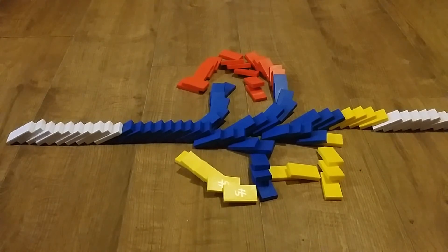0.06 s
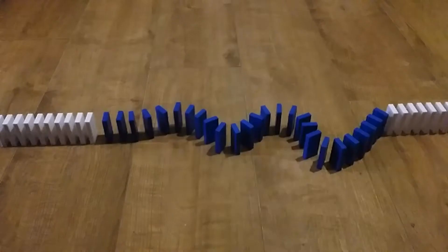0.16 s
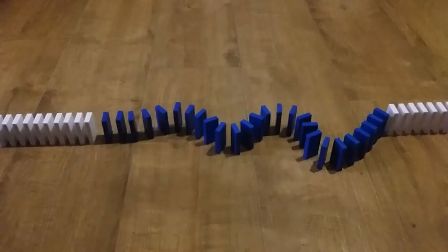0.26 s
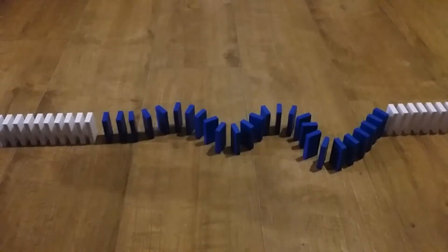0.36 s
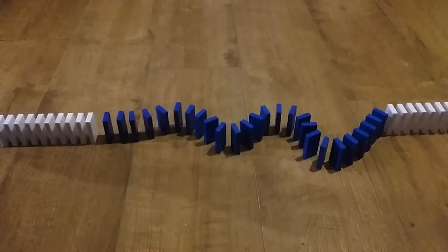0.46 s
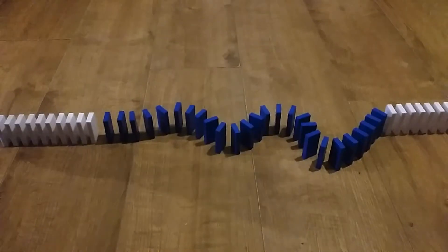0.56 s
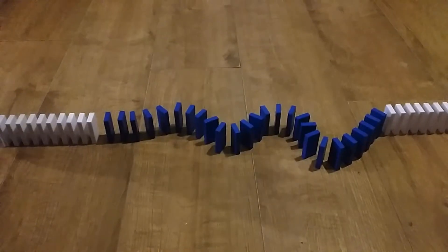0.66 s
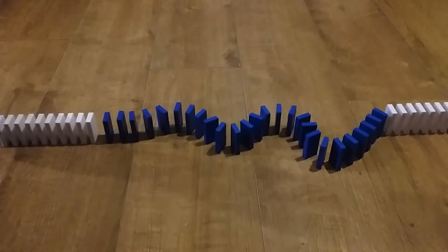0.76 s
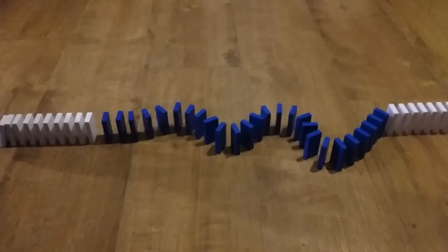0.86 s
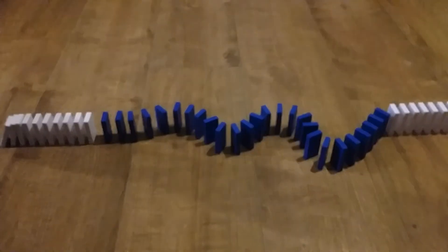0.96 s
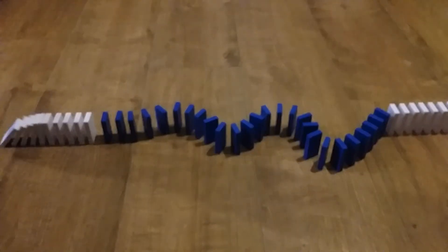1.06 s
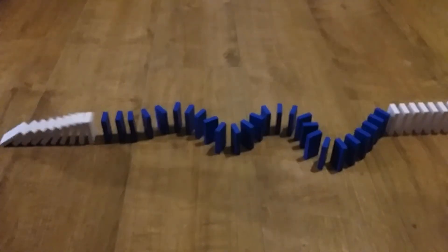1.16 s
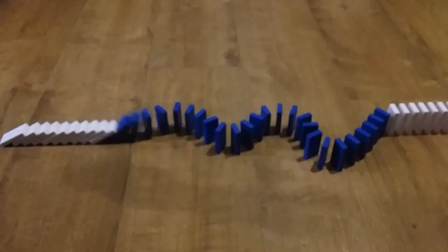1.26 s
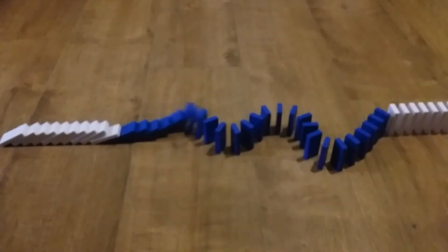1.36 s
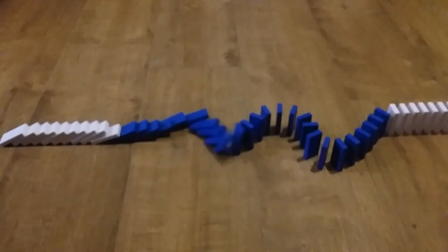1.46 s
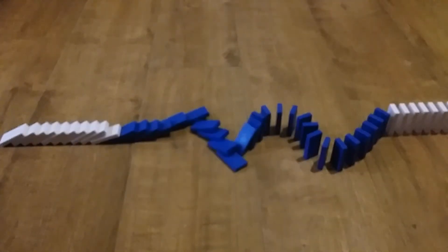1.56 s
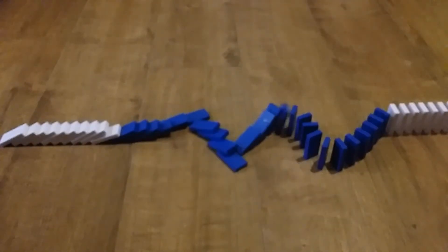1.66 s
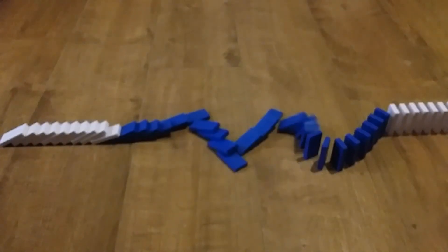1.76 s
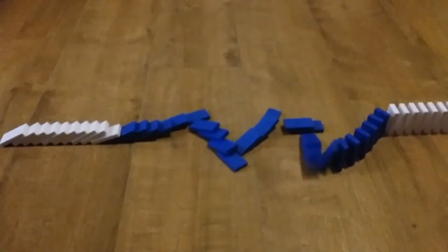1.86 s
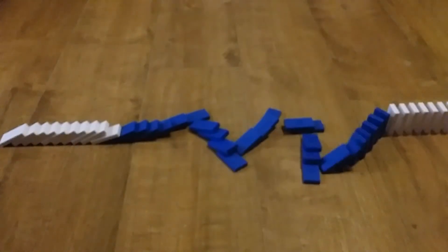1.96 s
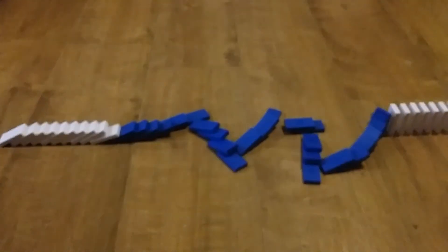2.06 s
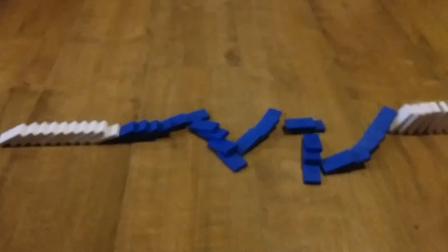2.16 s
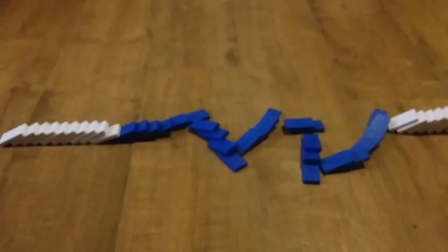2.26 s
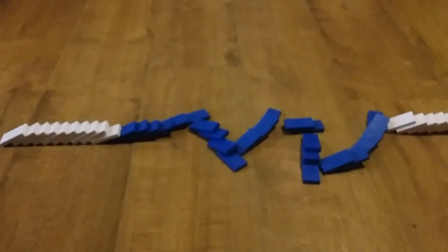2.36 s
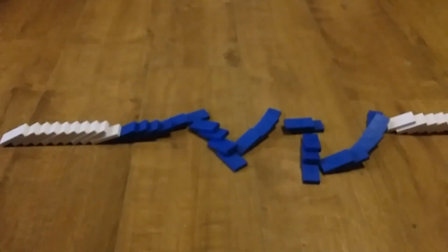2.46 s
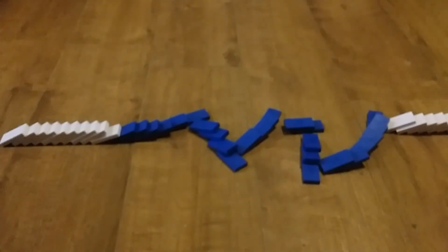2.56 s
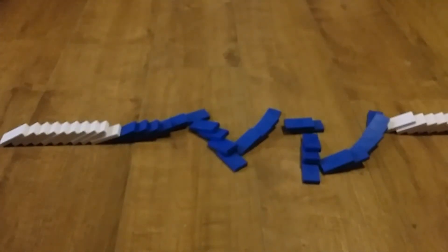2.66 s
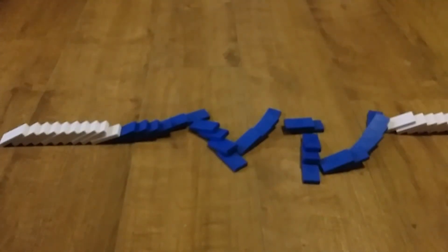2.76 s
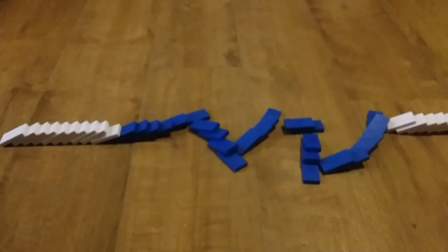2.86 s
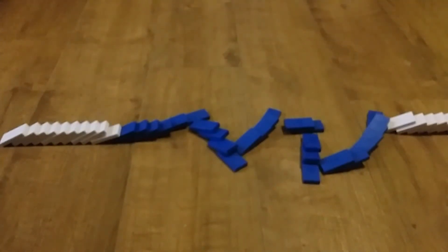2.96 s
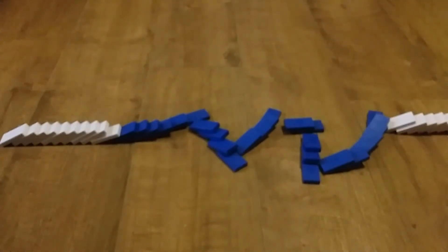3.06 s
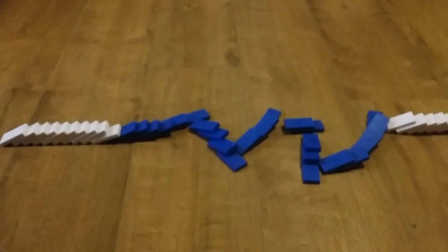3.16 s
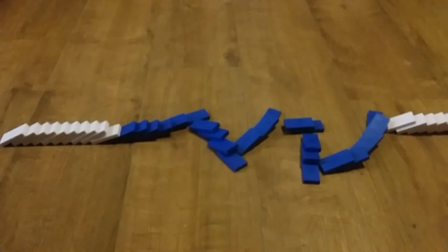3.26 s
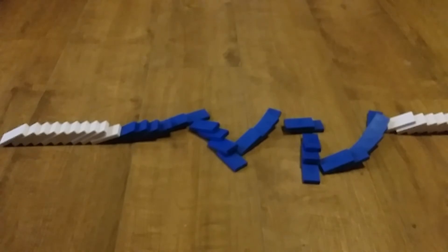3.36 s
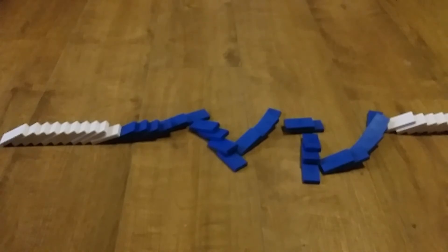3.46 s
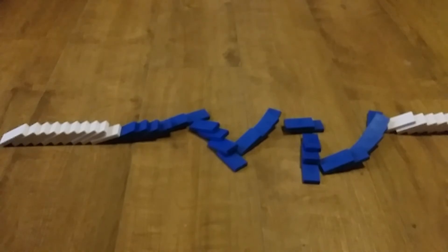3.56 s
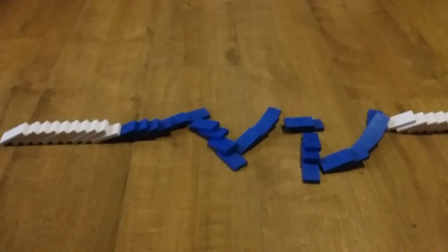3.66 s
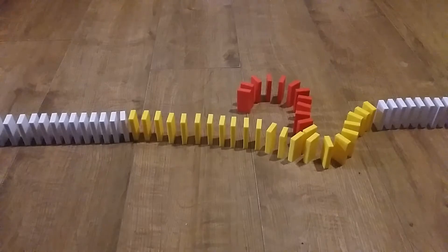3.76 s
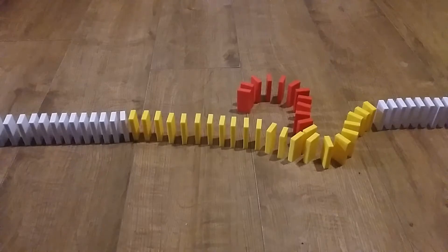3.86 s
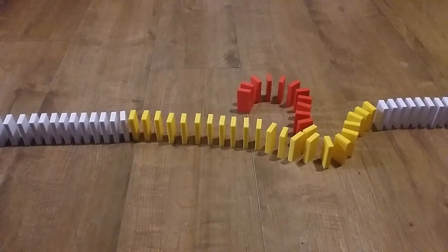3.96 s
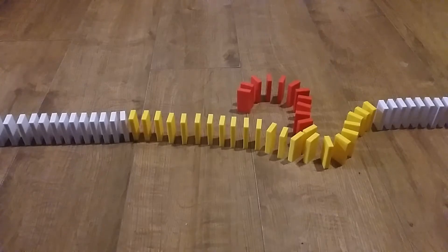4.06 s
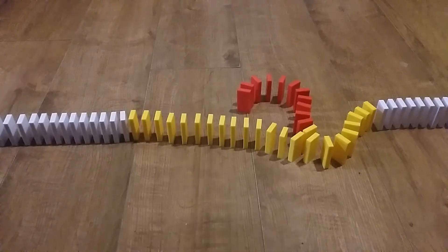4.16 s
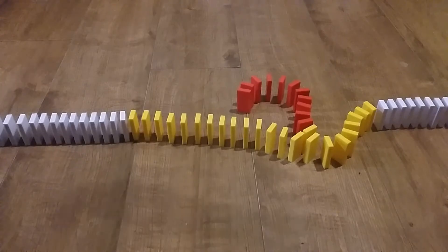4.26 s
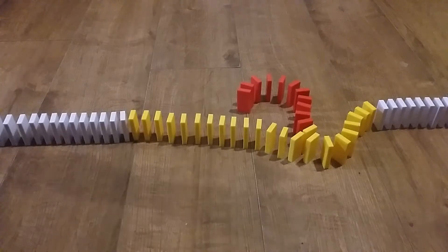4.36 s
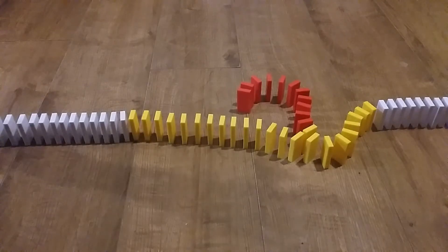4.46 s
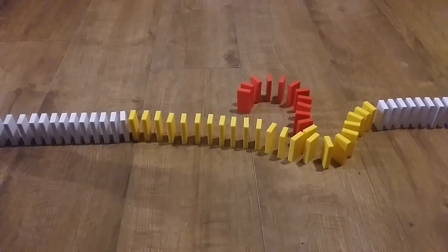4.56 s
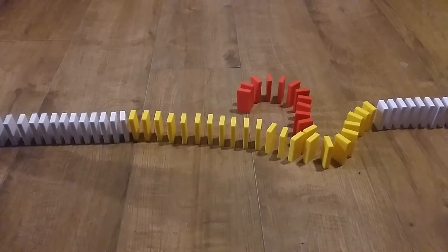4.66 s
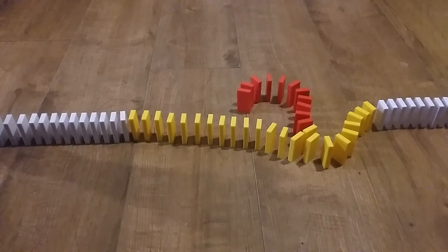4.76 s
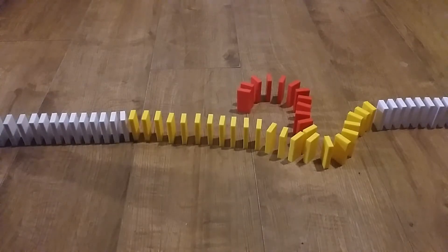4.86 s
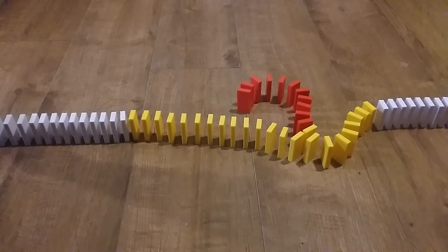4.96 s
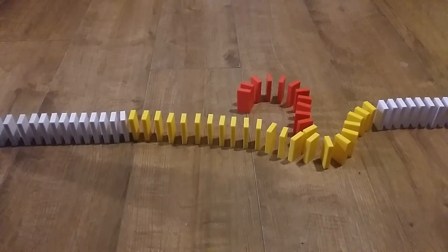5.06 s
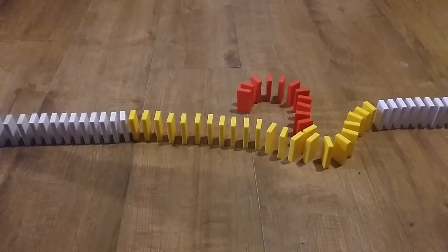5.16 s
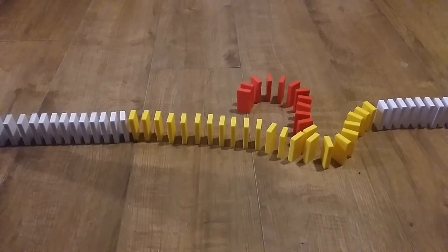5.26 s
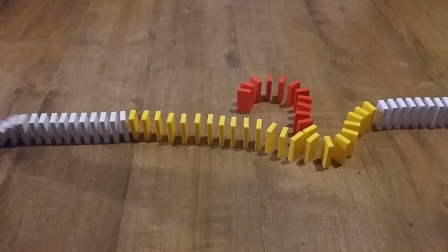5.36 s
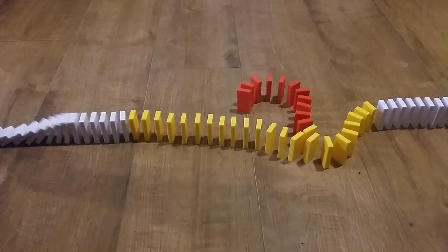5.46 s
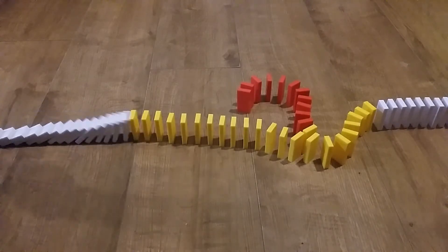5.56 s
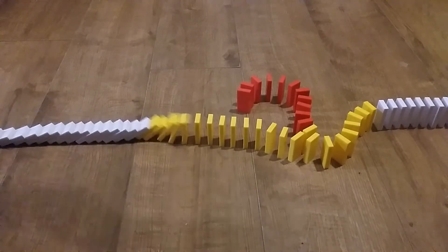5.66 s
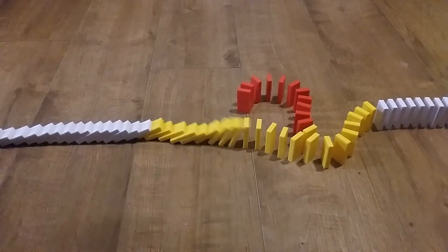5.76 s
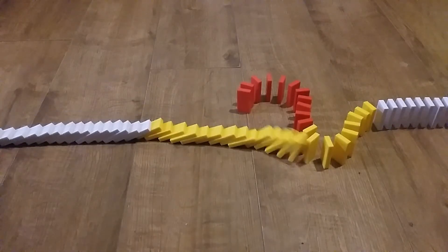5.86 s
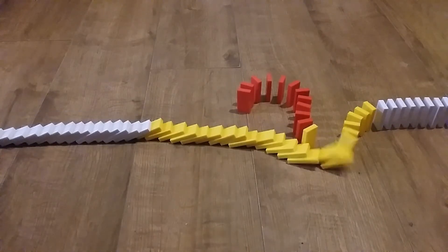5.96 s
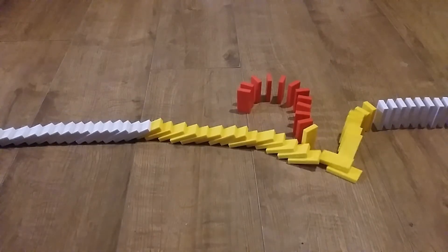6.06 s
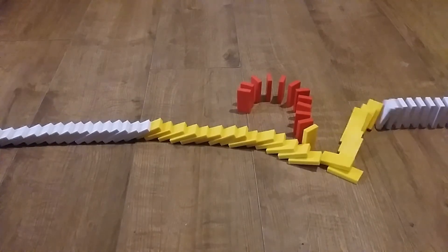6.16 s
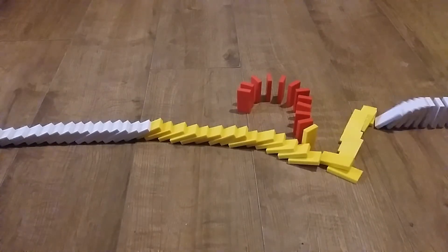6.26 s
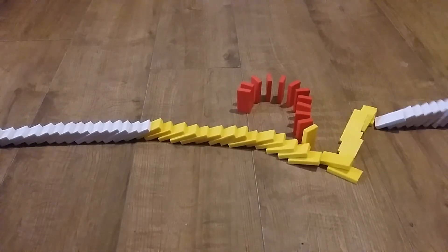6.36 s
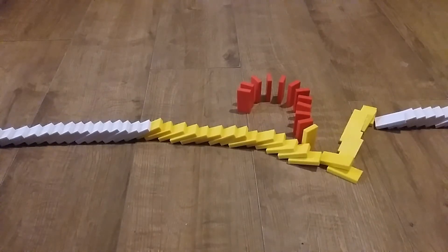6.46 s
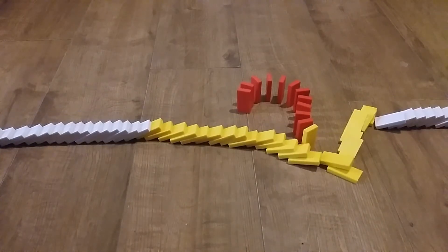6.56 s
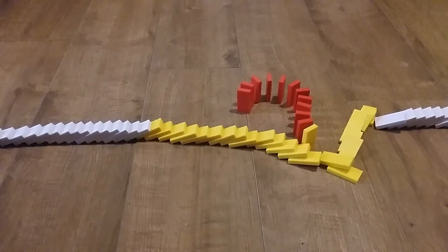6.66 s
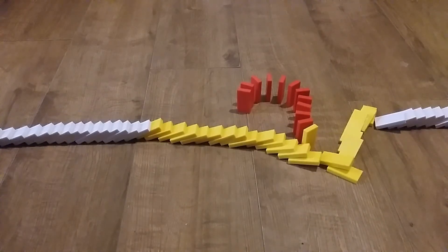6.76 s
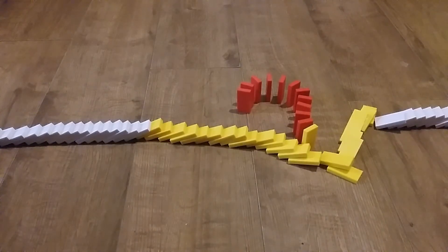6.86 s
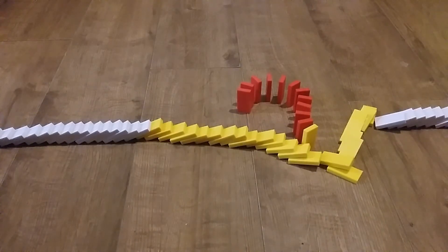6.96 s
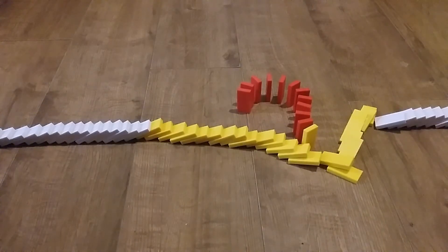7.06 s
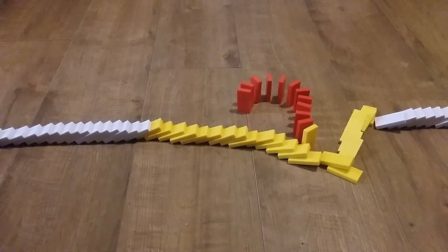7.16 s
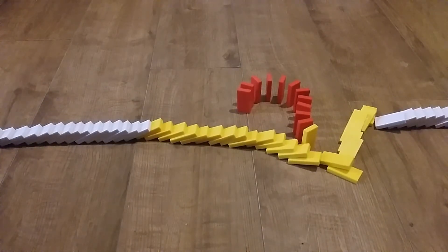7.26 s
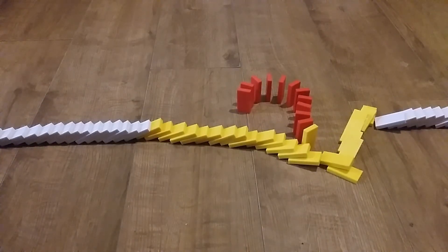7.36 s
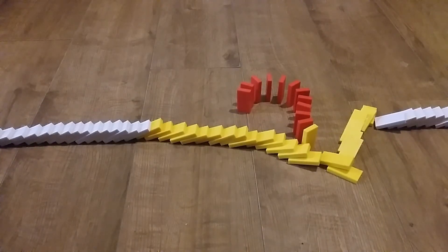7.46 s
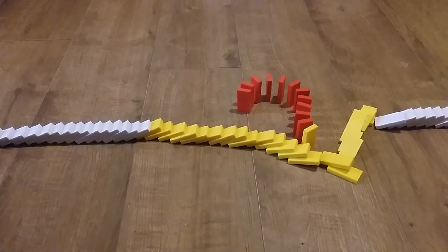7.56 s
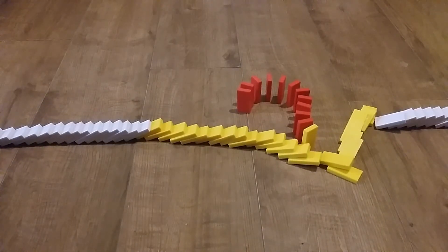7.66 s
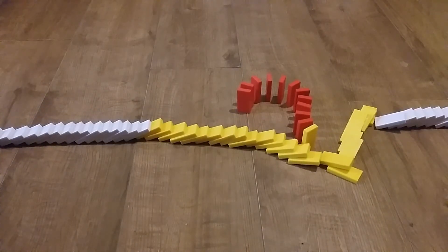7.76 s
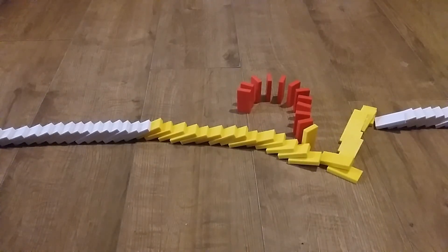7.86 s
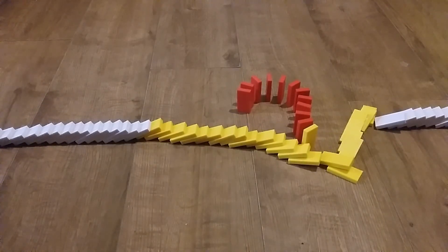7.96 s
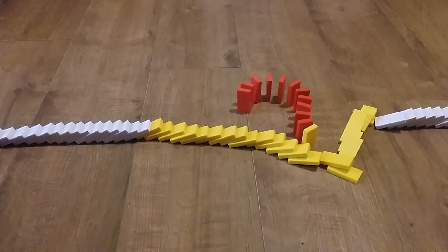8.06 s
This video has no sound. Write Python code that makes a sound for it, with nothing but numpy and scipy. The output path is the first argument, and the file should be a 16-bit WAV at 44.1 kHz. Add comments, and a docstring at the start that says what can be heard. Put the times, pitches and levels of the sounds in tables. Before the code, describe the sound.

Indoors on a wooden floor, a line of small plastic dominoes starts with sparse soft ticks, then accelerates into a bright, dense clatter with sharp slaps and low board thumps. It stops abruptly. After a quiet pause, tiny dry clicks bring in a faint low hum, and a second, brighter run rattles past and ends. The pickup is close in stereo, the sound moving left to right with short room reflections.

```python
"""Small plastic dominoes clatter down on a wooden floor indoors, in two runs that pass from left to right.
Each line starts slowly and gathers speed, louder and brighter: a tile ticks against the next and slides down.
Tiles that fall free, mostly at the bends and ends, slap the boards, which thump below.
Contacts excite banks of decaying modes, and dense decaying noise gives the room's reflections.
Shaped noise makes a quiet hiss; sines make a mains hum, heard at the start and again before the second run."""
import sys
import numpy as np
from scipy import signal
from scipy.fft import rfft, irfft
from scipy.io import wavfile
from scipy.ndimage import uniform_filter1d, map_coordinates

SR = 44100
rng = np.random.default_rng(int(sys.argv[2]) if len(sys.argv) > 2 else 0)


def persist_wave(psi):
    """Save psi, clipped to +-1, as 16-bit WAV."""
    counts = np.round(np.clip(psi, -1, 1) * 32767).astype(np.int16)
    wavfile.write(sys.argv[1], SR, np.atleast_2d(counts).T)


N = 357210
TIME = np.arange(N) / SR


def from_db(db):
    """Logarithmic level: decibels become an amplitude gain."""
    return 10 ** (np.asarray(db) / 20)


def rms_one(x):
    """Normalisation: scale to an rms of 1."""
    return x / np.sqrt(np.mean(x ** 2) + 1e-20)


def at_hz(points, size):
    """Log-frequency interpolation: read a (Hz, value) table at the bins of an FFT of this size."""
    hz, value = np.transpose(points)
    return np.interp(np.log(np.fft.rfftfreq(size, 1 / SR) + 1), np.log(hz), value)


def cut(x, hz, kind, order=2):
    """Maximally flat filtering: a Butterworth high- or low-pass."""
    sections = signal.butter(order, min(hz, .45 * SR), kind, fs=SR, output="sos")
    return signal.sosfilt(sections, x + 1e-18)


# Likeness of diffuse sound at the two ears. Each row: frequency in Hz, left-right correlation.
EAR_LIKENESS = [(100, 0.63), (500, 0.46), (1000, 0.096), (2000, 0.12), (14000, 0)]


def diffuse(size, spectrum=((20, 0), (20000, 0))):
    """Interaural correlation: stereo noise of rms 1 that is most alike at the two ears in the bass."""
    mid, side = rfft(rng.standard_normal((2, size)))
    alike = np.clip(at_hz(EAR_LIKENESS, size), -1, 1)
    both = np.sqrt(1 + alike) * mid + np.sqrt(1 - alike) * side * [[1], [-1]]
    return rms_one(irfft(both * from_db(at_hz(spectrum, size)), size))


# Spectrum of the room hiss. Each row: frequency in Hz, relative density in dB per Hz.
HISS_SPECTRUM = [(15, -45.5), (25, -14), (50, -9.5), (100, -1), (181, -12), (462, -14.5), (501, -17.5),
                 (558, -17.5), (2560, -27), (6040, -38.5), (13800, -35), (15000, -40.5)]
# Spectrum of the rush that joins the hum. Each row: frequency in Hz, relative density in dB per Hz.
RUSH_SPECTRUM = [(76, -29), (130, 4), (162, -13.5), (197, -6.5), (271, -12.5), (312, -5), (412, -9),
                 (747, -18.5), (948, -19), (3810, -31.5), (7480, -48), (13900, -37.5), (15000, -49.5)]
# Partials of the mains hum. Each row: frequency in Hz, rms in dB before the waver and the side balance.
HUM_PARTIALS = [(99.82, -50), (199.64, -80.5), (299.5, -82.5), (425.5, -76.5)]
# Soft swells of the rush. Each row: peak in seconds, level in dB above the rush, attack and release in seconds.
RUSH_SWELLS = [(4.142, 4, 0.063, 0.29), (4.283, 8.5, 0.0059, 0.085), (7.95, -5, 0.32, 0.4)]
HUM_OFF_S, HUM_ON_S = .15, 3.82
HUM_LAG_S = .0004   # the hum reaches the right ear later
HISS_DB, RUSH_DB = -72, -66
SILENT_UNTIL_S, HISS_FADE_S = 0.54, 0.4


def background(waver_db=1.1, waver_hz=12, swell_above_hz=300):
    """Additive hum and filtered noise: wavering hum and rush switch abruptly; hiss stops too, then fades in."""
    fade_in = np.clip((TIME - SILENT_UNTIL_S) / HISS_FADE_S, from_db(-58), 1)
    present = (TIME < HUM_OFF_S) + fade_in
    hiss = from_db(HISS_DB) * present * diffuse(N, HISS_SPECTRUM)

    running = uniform_filter1d(1. * ((TIME < HUM_OFF_S) | (TIME > HUM_ON_S)), size=100)
    ear_time = TIME - [[0], [HUM_LAG_S]]
    hum = sum(np.sqrt(2) * from_db(db) * np.sin(2 * np.pi * (hz * ear_time + rng.random()))
              for hz, db in HUM_PARTIALS)
    hum *= from_db(waver_db * rms_one(cut(rng.standard_normal(N), waver_hz, "low")))

    swell = sum(from_db(db) * np.interp(TIME, [s - attack, s, s + release], [0, 1, 0])
                for s, db, attack, release in RUSH_SWELLS)
    swelling = swell * cut(diffuse(N, RUSH_SPECTRUM), swell_above_hz, "high")
    rush = from_db(RUSH_DB) * (diffuse(N, RUSH_SPECTRUM) + swelling)
    # the hum leans right and the rush leans left
    return hiss + running * (hum * from_db([[-.8], [.8]]) + rush * from_db([[.7], [-.7]]))


def strike(times, level_db, modes, spread_db, detune, touch_s, flipped, count, lead=0, depth_db=0, order=3):
    """Modal synthesis: impulses ring a bank of damped resonators; `times` has one row of contacts per tile.

    Each contact is `count` tiny touches, the first stronger by `lead`, with a mode mix of its own.
    `depth_db` per octave favours the low modes; each tile has one of `order` tunings."""
    hz, width, mode_db = np.transpose(modes)
    tuned = np.repeat((rng.random(len(times)) * order).astype(int), times.shape[1])
    times, level_db, depth_db = [v.reshape(-1, 1) for v in np.broadcast_arrays(times, level_db, depth_db)]

    uneven_db = spread_db * rng.standard_normal((len(times), len(hz)))
    mix = from_db(mode_db - depth_db * np.log2(hz / hz[0]) + uneven_db) * np.sqrt(width)
    polarity = np.where(rng.random(mix.shape) < flipped, -1, 1)
    mix *= polarity / np.linalg.norm(mix, axis=1, keepdims=True)

    lag = rng.random((len(times), count)) * (np.arange(count) > 0)
    force = rng.standard_normal(lag.shape) * np.exp(-lag) + lead * (np.arange(count) == 0)
    force *= from_db(level_db) / np.linalg.norm(force, axis=1, keepdims=True)
    at = np.clip(((times + touch_s * lag) * SR).astype(int), 0, N - 1)

    first = at.min()
    size = min(N, at.max() + SR // 2) - first
    out = np.zeros(size)
    for j, tuning in enumerate(1 + detune * np.linspace(-1, 1, order) ** 3):
        mine = tuned == j
        for k, r in enumerate(np.exp(-np.pi * width / SR)):   # pole radius from the mode's width
            pushes = (force[mine] * mix[mine, k, None]).ravel()
            clicks = np.bincount(at[mine].ravel() - first, pushes, size) + 1e-18
            poles = [1, -2 * r * np.cos(2 * np.pi * hz[k] * tuning / SR), r * r]
            out += signal.lfilter([np.sqrt((1 - r * r) / 2)], poles, clicks)
    band = signal.lfilter([1, 0, -1], [1], out)   # nulls at zero frequency and at the top
    return np.pad(band, (first, N - first - size))


# Low modes of the floorboards. Each row: frequency in Hz, width in Hz, relative level in dB.
BOARD_MODES = [(229, 56, -13), (327, 14, -3), (377, 16, -6.5), (398.4, 16, 3.5), (435, 44, 1),
               (526, 76, -3.5), (557.6, 33, 1), (606.6, 43, -4.5), (656.6, 17, -3.5)]
# The hard surface right under a tile. Each row: frequency in Hz, width in Hz, relative level in dB.
KNOCK_MODES = [(864, 200, 1.5), (1050, 130, 3), (1209, 140, -0.5), (1520, 400, -3)]
# A tile chattering on its edge. Each row: frequency in Hz, width in Hz, relative level in dB.
RATTLE_MODES = [(2000, 1600, 6), (2620, 250, 0.5), (3200, 450, -8)]


def floor_sound(times, thump_db, depth_db, knock_db, rattle_db, thud_db=-10):
    """In-phase modal excitation: most board modes start together as a punch; the tile knocks, then chatters."""
    boards = strike(times, thump_db, BOARD_MODES, spread_db=3.5, detune=0.005, touch_s=0,
                    flipped=0.093, count=1, depth_db=depth_db)
    body = cut(cut(boards, 260, "high", order=5), 860, "low")
    thud = from_db(thud_db) * cut(boards, 190, "low", order=4)
    knock = strike(times, knock_db, KNOCK_MODES, spread_db=3.1, detune=0.074, touch_s=.0015,
                   flipped=.5, count=4, lead=2.4, order=5)
    rattle = strike(times, rattle_db, RATTLE_MODES, spread_db=-2.96, detune=0.061, touch_s=.007,
                    flipped=.5, count=7, lead=0.45, order=5)
    contact = cut(knock, 630, "high") + cut(rattle, 800, "high")
    return body + thud + cut(contact, 5400, "low", order=3)


# Ring of a hollow tile. Each row: frequency in Hz, width in Hz, relative level in dB.
TILE_MODES = [(3247, 310, -15.5), (3870, 600, -14.5), (4310, 100, -5.5), (4441, 64, 7.5), (4680, 130, -6),
              (6000, 920, -15), (7020, 870, -13.5), (9900, 150, -11), (10830, 200, -6)]


def tile_sound(times, ring_db):
    """Damped resonance: hard plastic rings briefly, with slight differences of pitch among the tiles."""
    ring = strike(times, ring_db, TILE_MODES, spread_db=2, detune=0.008, touch_s=0.0014,
                  flipped=0.43, count=2, lead=1.5, order=5)
    return cut(cut(ring, 13000, "low", order=8), 3000, "high")


TICK_WIDTH_HZ = 360   # damping of the edge of a tile meeting the next one


def ticks(times, level_db, pitches_hz, touch_s=0.0018, second_touch=.6):
    """Exponentially damped sines: a short, bright tick per tile at its own pitch; the edge touches twice."""
    t, out = TIME[:SR // 50], np.zeros(N)
    for s, db, hz in zip(times.ravel(), level_db.ravel(), pitches_hz.ravel()):
        age = np.maximum(t - [[0], [touch_s * rng.random()]], 0)
        touches = np.sin(2 * np.pi * hz * age) * np.exp(-np.pi * TICK_WIDTH_HZ * age)
        tick = np.dot([1, second_touch], touches)
        out[int(s * SR):][:len(t)] += from_db(db) * tick / np.linalg.norm(tick)
    return cut(cut(out, 4800, "high"), 8300, "low", order=6)


# Stretches of a line; straight ones click brightly, bends glance softly. Each row: entry of the front in
# seconds, relative thump in dB, depth of the thump in dB per octave, relative knock and ring in dB.
LINE_STRETCHES = [(1.3, -6.5, 10.5, -8.5, -13), (1.385, -5, -1.5, -2.5, -2.5), (1.55, -7.5, -1, -0.5, -2),
                  (1.61, -8.5, 5, -5, -11), (1.72, -5, 1, -5, -11), (1.85, -3.5, -0.5, -1.5, -10.5),
                  (2.03, -4.5, 2, -4, -4), (2.19, -6.5, -5.5, -2.5, 4.5), (2.44, -8, 9, -9.5, -10),
                  (5.46, -10.5, 15, -10, -15.5), (5.53, -5, 10, -4.5, 4.5), (5.78, -2, -4.5, 5, 9.5),
                  (5.99, 2.5, -4, 3.5, 4), (6.12, -12.5, 1.5, -5, 5.5), (6.19, -7.5, -3.5, -1, -2.5),
                  (6.29, -6, 0, -2, -10.5), (6.42, -11, -5.5, -18, -2), (6.55, -16.5, 10, -32.5, -25.5)]


def stretch_at(times):
    """Piecewise-constant excitation: the columns of the stretch that the front is passing at these times."""
    columns = np.transpose(LINE_STRETCHES)
    return columns[:, np.searchsorted(columns[0, 1:], times)]


LULL_S, LULL_DB = 0.019, -2.5


def lull_db(times):
    """Loss of contact: a tile falling free touches nothing, so the clatter thins just before it lands."""
    wait = np.transpose(FREE_FALLS)[0] - times[..., None]
    return LULL_DB * ((wait > 0) & (wait < LULL_S)).any(axis=-1)


TILE_GAP_S = .0192   # between tiles once the front is up to speed
TICK_HZ, TICK_SPREAD = 7330, 0.055   # ticks of the softer tiles; scale of their relative pitch spread
SOFT_TICK_DB = -8.5   # offset of their tick column from their ring column


def toppling(start_s, end_s, jitter_s=.004, uneven_db=-2.0, count=70):
    """A travelling front: softer taps fill the gaps between louder ones, in rows of the louder taps' columns."""
    times = start_s + TILE_GAP_S * np.arange(count) + jitter_s * rng.uniform(-1, 1, count)
    _, thump, _, knock, ring = stretch_at(times)
    levels = np.transpose([thump, knock, knock, ring, ring + SOFT_TICK_DB])   # the rattle follows the knock
    levels = levels + uneven_db * rng.standard_normal((count, 5)) + lull_db(times)[:, None]
    louder = np.array([row[0] for row in [*LOUD_TAPS, *FREE_FALLS]])
    nearest_s = np.abs(times[:, None] - louder).min(axis=1)
    sounding = (nearest_s > TILE_GAP_S / 2) & (times < end_s)
    pitches_hz = TICK_HZ * (1 + TICK_SPREAD * rng.uniform(-0.72, 1, count))
    return np.column_stack([times, np.where(sounding[:, None], levels, -np.inf), pitches_hz])


# The two lines. Each row: the front is up to speed at in seconds, the last tile is down at in seconds.
LINE_RUNS = [(1.325, 2.56), (5.473, 6.655)]
# Tiles that stand out as they tip against their neighbour. Each row: start in seconds,
# relative levels of thump, knock, rattle, ring and tick in dB, tick pitch in Hz.
LOUD_TAPS = [(0.959, -31, -42.0, -40, -52, -57, 7280.0), (0.985, -23.5, -42, -47, -35.0, -36, 7180.0),
             (1.069, -26, -35, -48, -47.0, -47, 6860.0), (1.078, -24, -48.0, -50.0, -40, -45, 7270.0),
             (1.148, -18, -28, -38, -37, -48, 7200.0), (1.196, -13, -27.5, -30.5, -25, -29.5, 7440.0),
             (1.228, -10, -21.0, -26.5, -20.5, -30, 7610.0),
             (1.261, -10, -12.5, -16.5, -11.5, -18.5, 7370.0), (1.286, -8, -8, -11, -8.5, -13.0, 7270.0),
             (1.31, -7.0, -5.5, -10.0, -0.5, -9.0, 7340.0), (1.328, -9.0, -10.5, -10, -6.5, -12.5, 7030.0),
             (1.427, -9, -1.5, 5.5, 1.0, -3.5, 6910.0), (1.451, -3, 4, 3, 2.5, -6, 7310.0),
             (1.475, -6.5, -0.5, 1.5, -1, -7, 7200.0), (1.493, -2.5, -3, 6.5, 1.5, -7.5, 7160.0),
             (1.503, -2.5, 1.0, 1, 4.5, -7.5, 7170.0), (1.522, -1.5, 0, -0.5, -1.5, -8.5, 6970.0),
             (1.581, -5.0, 0.5, -2.5, -3.5, -16.0, 7200.0), (1.593, -5.5, -2, -2.5, -5.5, -23.5, 7100.0),
             (1.6591, 2.5, -3, 0, -2.5, -10.5, 6710.0), (1.857, -2, -1.0, -4, -4.5, -10.5, 7040.0),
             (1.897, -4.5, 3, 1.5, -2, -12.5, 6520.0), (2.166, -2, -4, -9.0, -8.5, -3.0, 6860.0),
             (2.199, 5, 0, -4, 1.5, -8, 7040.0), (2.229, 2, 4, -3, 0, 2, 7260.0),
             (2.252, -9, 0, -1, -9, -8, 7070.0), (2.27, -5, -7, -0.5, 0.5, -3.5, 7370.0),
             (2.278, 3.5, 0.5, -2.5, -9, -6, 7400.0), (2.311, -6, 1, 1, 5, 2.5, 7210.0),
             (2.331, -0.5, -2.5, -6, 0.5, 4, 7430.0), (2.353, -4.0, -3, -0.5, 2.5, -3.5, 7380.0),
             (2.373, -4.0, -1.5, 0, -1, 0.5, 7260.0), (2.391, -1.5, -8, -6, -1, -5.5, 7260.0),
             (2.41, -8, 2, 2.5, 2, -4, 7070.0), (2.428, -0.5, 1.5, -2.5, 0.5, 2.5, 7010.0),
             (2.4808, -7.5, -1, 10, -3.5, -7.5, 7060.0), (5.371, -13, -20.5, -17.5, -18, -27.5, 7140.0),
             (5.404, -13.5, -7, -29.5, -13, -27.0, 7050.0), (5.4562, -11, -11, -7.5, -10.5, -15.5, 7300.0),
             (5.496, -4, -19, -3.5, -7, -13.5, 7000.0), (5.529, -4.5, -10, 1, -1.5, -13.5, 6890.0),
             (5.555, -5.5, -19, 4.5, -2.5, -10.5, 7230.0), (5.591, -7, -0.5, -8, -4, -11, 7060.0),
             (5.667, -5, -5.5, -9, 0, -6, 7130.0), (5.685, -4, -7, -1.5, 0.5, -2.5, 7260.0),
             (5.72, -5.5, -4.0, 1.5, 2.5, -10.5, 7060.0), (5.736, -1.0, 1, -5.5, 0.5, -3.5, 7290.0),
             (5.761, -6, -1.5, 1.5, 5.0, -1, 7160.0), (5.804, 0, 7, 8.0, 8, 1, 7010.0),
             (5.83, -2, 4, 1, 11, 4.5, 7190.0), (5.875, -3.5, 6.5, 6, 10, 1.5, 7090.0),
             (5.916, 1, 2.5, 8.5, 3.5, -2, 7300.0), (5.935, -3.5, 3.5, 4.5, 7, 1, 7200.0),
             (5.957, -3.5, 4, 0, 0.5, 1.5, 6930.0), (5.997, -4, 3.5, 4.5, 9, -3.5, 7360.0),
             (6.042, 3, 5.5, 3, -1.5, -9.0, 6810.0), (6.063, -5, 3.5, 9, 4, 0, 7240.0),
             (6.085, -2.5, 3.5, 7.5, -1.0, -15, 6930.0), (6.102, -4.5, 0, 3.5, -2.0, -11.5, 6560.0),
             (6.293, -7.5, -3.5, -15.5, -15.0, -14.5, 6810.0), (6.32, 2, 0, -3.5, -9.5, -11.0, 6970.0),
             (6.341, -2, -0.5, -0.5, -8.5, -9.5, 7230.0), (6.3617, 0.5, 0.0, 5, 5.5, 7, 6950.0),
             (6.458, -6.5, 1, -8, -7.5, -5.5, 7090.0), (6.48, -9, -4.5, -11.5, -2, -5, 7240.0),
             (6.503, -1, -8, -2, -5, -3.5, 7160.0), (6.522, -4, 0.5, -1, -17.5, -4.0, 7030.0),
             (6.58, 0, -14, 2, 8, 9.0, 7080.0), (6.666, -6, -11.5, 2.5, -8, -16, 6790.0)]


def clatter(slide_s=.021, rub_db=-10.0, rub_ring_db=-9, uneven_db=2.0, thump_db=-7.5, knock_db=-12.7,
            rattle_db=-16.0, ring_db=-22.5, tick_db=-20.0, count=5):
    """Repeated contact: each tile tips against the next with a tick, then touches it softly as it slides."""
    rows = np.vstack([LOUD_TAPS] + [toppling(*run) for run in LINE_RUNS])
    s, thump, knock, rattle, ring, tick, tick_hz = rows.T[:, :, None]
    touch = np.arange(count)
    sliding = touch > 0
    early, loud = rng.uniform(-1, 1, (len(s), count, 2)).transpose(2, 0, 1)
    times = s + sliding * slide_s * (touch + early / 2) / count
    touch_db = sliding * (uneven_db * loud + lull_db(times))
    rub = touch_db + sliding * rub_db
    ring_rub = touch_db + sliding * rub_ring_db
    boards = floor_sound(times, thump + thump_db + rub, stretch_at(s)[2],
                         knock + knock_db + rub, rattle + rattle_db + rub)
    return boards + tile_sound(times, ring + ring_db + ring_rub) + ticks(s, tick + tick_db, tick_hz)


# Crack of a tile landing flat. Each row: frequency in Hz, width in Hz, relative level in dB.
CRACK_MODES = [(2960, 780, 2), (4560, 200, -0.5), (5260, 1000, 1.5), (6400, 300, 7), (7130, 680, 0),
               (7900, 690, -15.5)]
# Glassy edge of a tile landing dead flat. Each row: frequency in Hz, width in Hz, relative level in dB.
SNAP_MODES = [(10060, 140, 13.5), (10800, 300, 2), (12600, 4700, -4.5)]
# Tiles that fall free and slap the floor. Each row: landing in seconds, relative thump in dB,
# depth of the thump in dB per octave, relative knock, ring, crack and snap in dB, clack pitch in Hz,
# relative clack in dB.
FREE_FALLS = [(1.366, -2, 2.5, -10, 1, -14, -0.5, 1524, -9), (1.3897, -1, -1.5, 0, 6, -0.5, 5, 2700, -1.5),
              (1.671, 7, 7.5, 5, 14, 18, 31.5, 2552, 6.5),
              (1.7886, 0.5, -2.5, 1.5, 8.5, 3.5, 12.5, 2258, -7.5),
              (1.927, 4, -3.5, 6, 8.5, 2, 3.5, 2288, 2), (1.99, 1.5, -3.5, 3, 5, 0.5, -1, 1520, -7.5),
              (2.0517, -1.5, 3.5, -2, 1.5, 6.5, 8, 1973, -3.5),
              (2.064, 2.5, 4.5, 6, 18, 13, 9.5, 3084, 2.5), (2.4528, -1.5, -5, 2, -1.5, 7.5, 8.5, 6500, -1),
              (2.4877, 4.5, 8.5, -11.5, -2.5, 11.5, 2, 1943, 6),
              (2.5145, 4.5, -1, 7.5, 8, 13, 17.5, 2567, 0.5), (5.7835, -4, -4.5, 2, 5.5, 3.5, 0, 3185, -9),
              (5.853, -7, -3.5, 5, 3.5, 7, 0, 3200, 3), (6.145, -3, 3, 1, 7, 0, 2, 7300, -17),
              (6.1746, 2, 6.5, 6.5, 7.5, 16.5, 25, 7000, 7.5), (6.3841, 7, -5.5, 8.5, 10, 11, 8, 1024, 2),
              (6.5851, 3, -7, -12, -17.5, 9.5, 5, 2455, 9), (6.613, 4.5, 6, 8, 14.5, 11.5, 26.5, 3365, 6)]
CLACK_WIDTH_HZ = 1000   # the hollow clack of a landing tile; its pitch depends on how the tile lies


def falls(thump_db=-5.5, knock_db=-11, rattle_db=-13.0, ring_db=-20.5, crack_db=-16.0, snap_db=-38,
          clack_db=-11, bounce_s=.005, bounce_db=-11):
    """Inelastic impact: each free tile thumps, cracks and clacks, then rebounds twice, ever softer."""
    s, thump, depth, knock, ring, crack, snap, clack_hz, clack = np.transpose(FREE_FALLS)[:, :, None]
    bounce = np.arange(3)
    times = s + bounce * bounce_s * rng.uniform(0.65, 1.1, (len(s), len(bounce)))
    loss = bounce * bounce_db
    cracks = strike(times, crack + crack_db + loss, CRACK_MODES, spread_db=0.5, detune=0.04, touch_s=0.002,
                    flipped=0.38, count=5, lead=3.0)
    snaps = strike(times, snap + snap_db + loss, SNAP_MODES, spread_db=2.5, detune=0, touch_s=0,
                   flipped=0, count=1, order=1)
    clacks = sum(strike(t[None], db, [(hz, CLACK_WIDTH_HZ, 0)], spread_db=0, detune=0, touch_s=0.0038,
                        flipped=0, count=3, lead=3.6, order=1)
                 for t, db, hz in zip(times, clack + clack_db + loss, clack_hz.ravel()))
    boards = floor_sound(times, thump + thump_db + loss, depth,
                         knock + knock_db + loss, knock + rattle_db + loss)
    tiles = tile_sound(times, ring + ring_db + loss)
    return boards + tiles + cut(cracks + snaps, 3100, "high") + cut(clacks, 900, "high")


ROOM_T60_S, BASS_T60_S, ROOM_DB = 0.19, 0.15, 0.5   # decay of the reflections and of their bass; level
LATE_T60_S, LATE_DB = 0.7, -48   # the faint late tail


def room(x, gap_s=0.0013, paths_per_s=23, bass_db=-5.5, treble_db=-4.0, bass_below_hz=750, count=4):
    """Reverberation: after a gap, dense reflections, weaker and shorter in the bass, vary as the front travels."""
    t = TIME[:SR // 2]
    late = from_db(LATE_DB - 60 * t / LATE_T60_S)
    bass_decay, decay = [(from_db(-60 * t / t60) + late) * (t > gap_s) for t60 in (BASS_T60_S, ROOM_T60_S)]
    out = x
    for k in range(count):
        noise = diffuse(len(t), [(450, bass_db), (1000, 0), (5000, 0), (8000, treble_db)])
        bass = cut(noise, bass_below_hz, "low", order=3) * bass_decay
        tail = bass + cut(noise, bass_below_hz, "high", order=3) * decay
        response = from_db(ROOM_DB) * rms_one(tail) / np.sqrt(len(t))
        # each pattern fades in and out in turn, over and over
        away = np.abs((TIME * paths_per_s + k) % count - count / 2)
        share = np.cos(np.pi / 2 * np.minimum(away, 1))
        out = out + signal.oaconvolve((x * share)[None], response, axes=1)[:, :N]
    return out


# Small dry clicks around the return of the hum. Each row: start in seconds, relative level in dB,
# 60 dB decay time in seconds.
DRY_CLICKS = [(3.781, 12, 0.0045), (3.789, 11, 0.058), (3.819, 19, 0.005)]


def small_clicks(dull_hz=1000, level_db=-47.5):
    """Exponential decay of noise: two dry ticks with a slightly longer knock between them."""
    out = np.zeros(N)
    for s, db, t60 in DRY_CLICKS:
        out += (TIME >= s) * from_db(db - 60 * np.clip((TIME - s) / t60, 0, 2))
    return from_db(level_db) * cut(out * diffuse(N), dull_hz, "low", order=1)


# Balance of the dominoes. Each row: frequency in Hz, left minus right in dB.
LEFT_RIGHT_BALANCE = [(250, 0), (500, -0.84), (1200, 1.8), (3000, 4), (4400, 7), (5500, 13.5), (7500, 20.5),
                      (10500, 8.5), (15000, 10.5)]
# Passage of the front from left to right. Each row: time in seconds, delay of the right ear in seconds.
RIGHT_EAR_DELAY = [(1.0, .00018), (1.7, .00005), (2.5, -.00009), (5.3, .00022), (5.8, .0001),
                   (6.6, -.00009)]


def scene():
    """Interaural time and level differences: dominoes pass left to right, their treble stronger on the left."""
    left, right = room(falls() + clatter())
    delay_s = np.interp(TIME, *np.transpose(RIGHT_EAR_DELAY))
    right = map_coordinates(right, [SR * (TIME - delay_s)], order=3)
    sides = from_db(at_hz(LEFT_RIGHT_BALANCE, N) * [[.5], [-.5]])
    dominoes = irfft(rfft([left, right]) * sides / sides.mean(axis=0), N)
    return dominoes + background() + small_clicks()


CUTOFF_HZ = 15000


def record(dry):
    """Saturation and band-limiting: the highest peaks are rounded and the top is cut steeply."""
    top = .8
    rounded = top * np.tanh(dry / top)
    return signal.sosfilt(signal.ellip(10, .1, 80, CUTOFF_HZ, fs=SR, output="sos"), rounded)


dry = scene()
out = record(dry)
persist_wave(out)
```